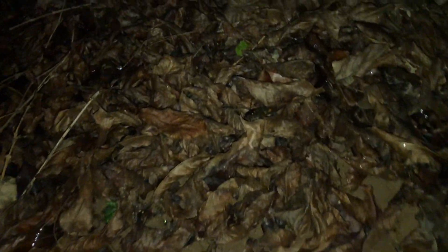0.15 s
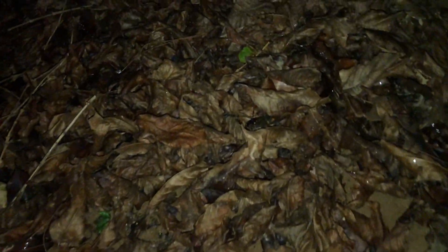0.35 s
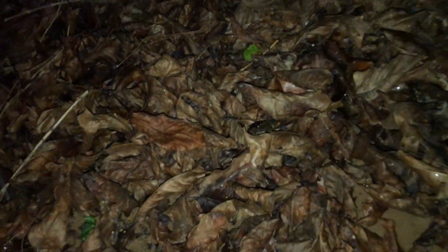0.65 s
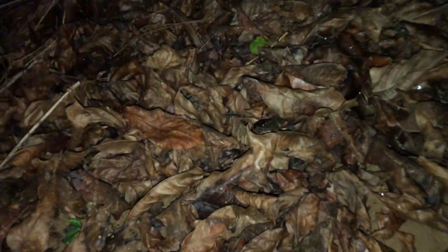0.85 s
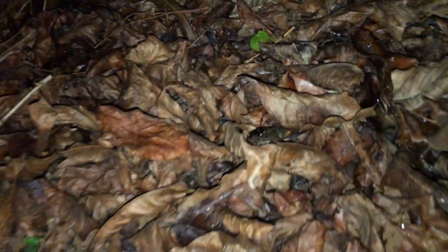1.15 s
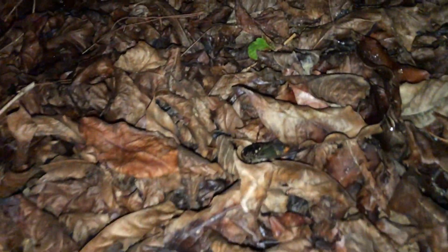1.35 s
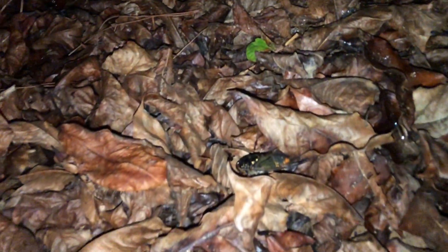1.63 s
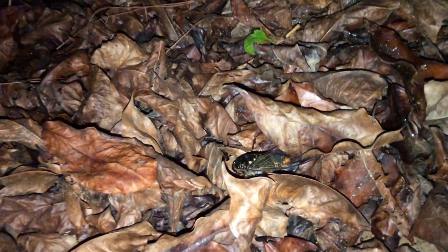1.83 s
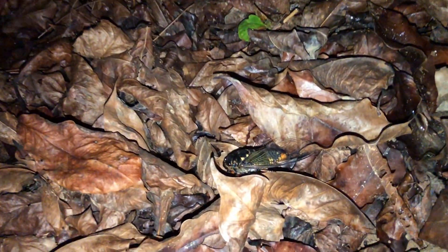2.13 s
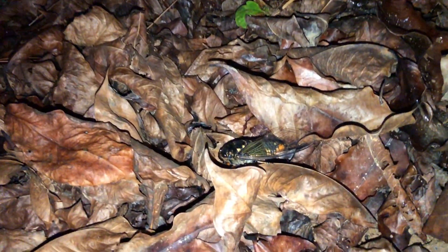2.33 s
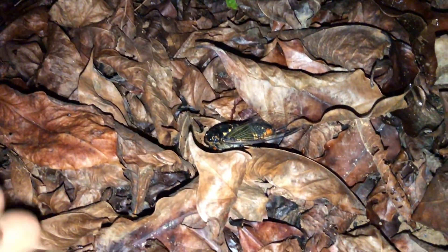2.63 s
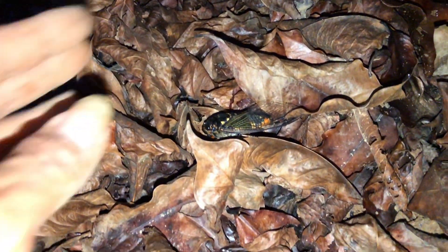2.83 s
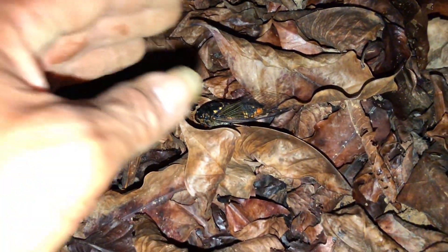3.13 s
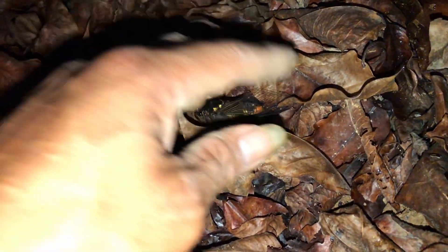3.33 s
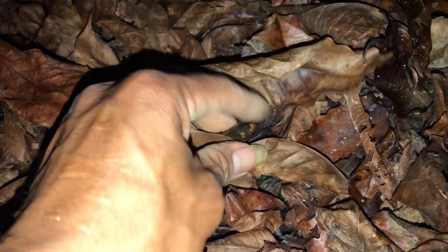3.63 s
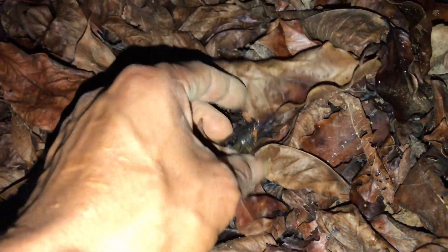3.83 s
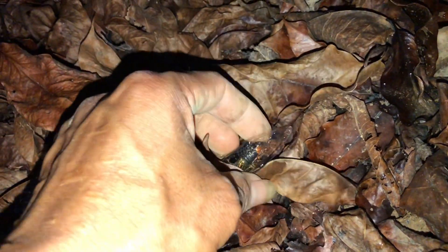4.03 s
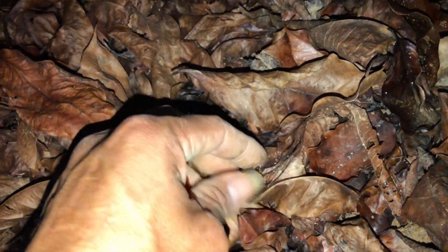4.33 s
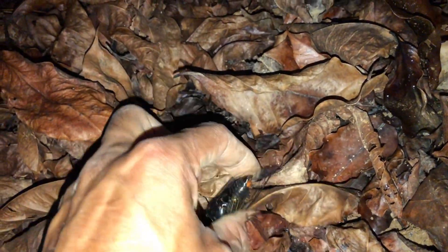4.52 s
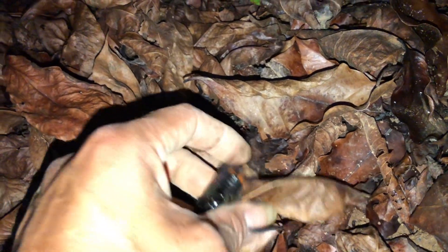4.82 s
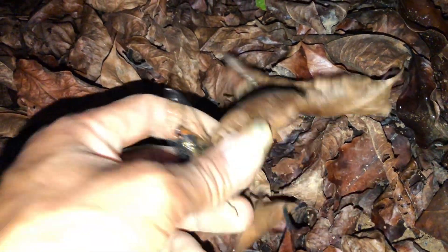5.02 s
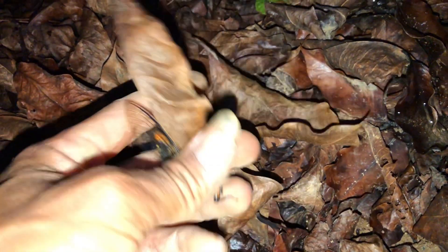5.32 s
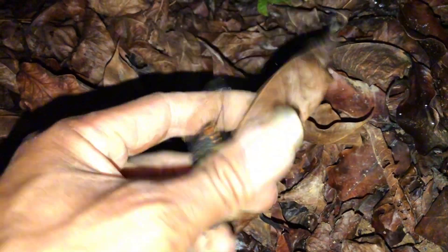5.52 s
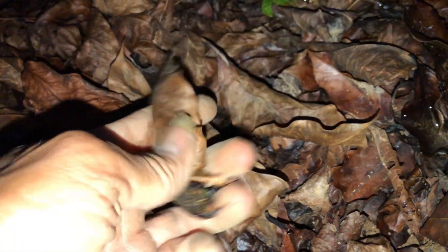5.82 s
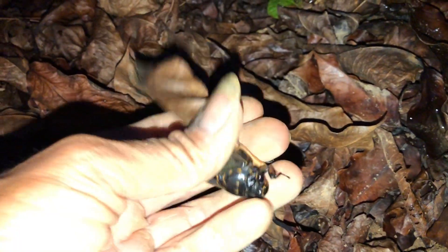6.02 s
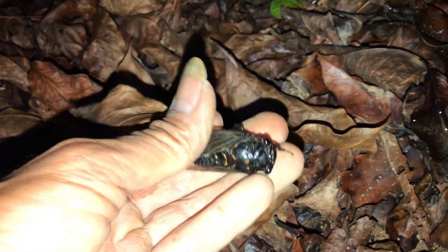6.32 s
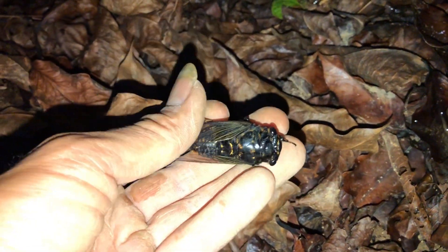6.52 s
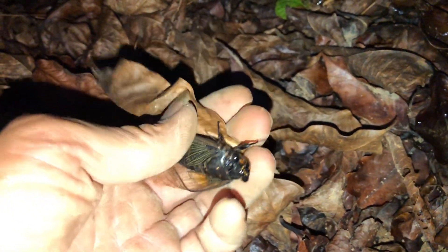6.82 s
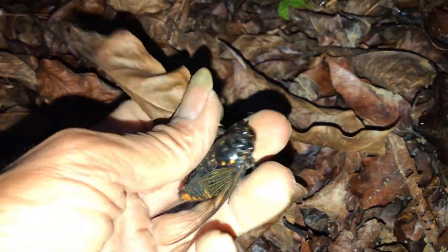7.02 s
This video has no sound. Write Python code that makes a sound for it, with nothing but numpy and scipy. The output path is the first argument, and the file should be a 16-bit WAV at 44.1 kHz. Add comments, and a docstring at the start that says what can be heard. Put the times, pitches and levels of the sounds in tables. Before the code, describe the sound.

In a forest at night, a high insect chorus hums with pulsing crickets and a far cicada whose buzz stops abruptly and later returns. Soft footfalls and finger bumps sound on damp leaves. Midway, a hand seizes a cicada, which erupts into a loud, dry, rattling screech very near the microphone, its tone shifting in the grip until the end.

```python
"""A seized cicada cries close by, over soft thuds, insects and low rumble in a forest at night.
Cicada: two tymbals buckle in turn, rib by rib, ringing body modes; hand and ground add echoes.
Far cicada: noise pulsed by blurred clicks. Crickets: pulsing tones and narrow noise. Katydid: noise strokes.
Feet on damp leaves and fingers: short damped sines. Far chorus, rumble and murmur: shaped noise."""
import sys
import numpy as np
from scipy import signal
from scipy.fft import rfft, irfft, next_fast_len
from scipy.io import wavfile
from scipy.ndimage import uniform_filter1d, minimum_filter1d, map_coordinates

SR = 44100
rng = np.random.default_rng(int(sys.argv[2]) if len(sys.argv) > 2 else 0)


def store_pcm(level_fs):
    """Save levels as 16-bit WAV."""
    pcm = np.round(np.clip(level_fs, -1, 1) * 32767).astype(np.int16)
    wavfile.write(sys.argv[1], SR, np.atleast_2d(pcm).T)


N = 315756
T = np.arange(N) / SR  # s
SEIZED_S = 3.592  # the cry begins


def cicada():
    """The ringing body plus scatter, inverted echoes and finger taps; so small a body radiates no bass."""
    covered_hz, open_hz, opens_s, opening_s = 2440, 2160, 4.96, .0087
    turns = muscle_turns()
    cry = ringing_body(turns)
    # leaves and fingers scatter a short tail, most of all in the treble
    tails = scattered(cry, t60_s=.022, size=16000)
    cry += filtered(tails, lambda hz: amp(np.interp(hz, [7000, 10000], [-14, -3])))
    cry -= ground_and_palm(cry)
    # the bass edge drops as the body comes out of the leaves
    covered, bare = [signal.sosfilt(signal.butter(7, hz, "high", fs=SR, output="sos"), cry)
                     for hz in (covered_hz, open_hz)]
    opening = step(T, opens_s, opening_s)
    return finger_taps(turns) + covered + (bare - covered) * opening


def muscle_turns():
    """Muscle cycles completed so far: the rate rises exponentially to a steady value."""
    top_rate_hz = 51.3
    # run-up of the muscles: [initial shortfall/Hz, time constant/s]
    run_up = [(7, .06), (6.3, .9)]
    since_s = (T - SEIZED_S).clip(0)
    rate_hz = top_rate_hz - sum(short * np.exp(-since_s / tau) for short, tau in run_up)
    return np.cumsum(rate_hz * (since_s > 0)) / SR


def rib_clicks():
    """Buckling ribs of both tymbals: place/cycles, active from/s, to/s, low/dB, air sac/dB, high/dB."""
    # tymbals: [place of first rib/cycles, all ribs buckle from t/s, level/dB]
    tymbals = [(.2, 3.74, 0), (.7, 3.92, -1)]
    # ribs: [delay/cycles, drive of two low modes/dB, of air sac/dB, of higher modes and snap/dB]
    ribs = [(0, -7.5, -1, -1.5), (.155, 0, -7.5, -4), (.255, -13, -12, -11), (.36, -7.5, -3.5, -1)]
    # stands in for the later ribs until all buckle: same columns
    early_rib = (.21, -4.5, 0, -1)
    clicks = []
    for place, full_s, db in tymbals:
        active = [(0, T[-1], ribs[0]), (0, full_s, early_rib)]
        active += [(full_s, T[-1], rib) for rib in ribs[1:]]
        for first_s, last_s, (delay, low, sac, high) in active:
            clicks.append((place + delay, first_s, last_s, low + db, sac + db, high + db))
    return np.transpose(clicks)


def mode_levels(s):
    """Drive/dB of each body mode at times s, as the hand covers and turns the insect."""
    # cry: [t/s, base level/dB, then re base: lowest mode/dB, second mode/dB, shrill mode/dB]
    cry = [(3.6, -29.5, -11, -5, -16), (3.62, -19.5, -12, -5, -8), (3.76, -20.5, -7, -6, -13),
           (3.88, -19.5, -8.5, -4.5, -13.5), (4.01, -17, -26, -5.5, -4), (4.36, -19, -11, -8, -1.5),
           (4.61, -19, -12, -10, -1), (4.78, -17.5, -16.5, -12.5, -2), (4.88, -20, -12.5, -10.5, -1.5),
           (5.08, -17, -7, -4.5, -6), (5.31, -19.5, -3.5, 0, -11), (5.5, -18, -18.5, -3, -11),
           (5.69, -19.5, -11, -0.5, -11), (5.76, -17.5, -10, -3.5, -13.5), (6.41, -17, -11, -11, -2),
           (6.92, -18.5, -9.5, -3.5, -16.5), (7.13, -16, -8, -18, -6), (7.16, -15.5, -8, -23, -11)]
    # treble: [t/s, base level/dB]
    treble = [(3.6, -36), (3.61, -28.5), (4.77, -32.5), (5.19, -35), (5.29, -27.5), (5.42, -42), (5.5, -32),
              (5.96, -35.5), (5.98, -24.5), (6.26, -39.5), (6.7, -26), (6.88, -38), (6.97, -23),
              (7.16, -24)]
    level, lowest, second, shrill = curves(cry, s)
    treble_db = curves(treble, s)[0]
    # the air sac gives way as the second and the shrill mode grow
    sac = level + 4.5 - .43 * (second + shrill)
    return [level + 16.5 + lowest, level + 17 + second, sac, level + 14 + shrill,
            treble_db + 10, treble_db + 8, level + 16]


def sac_pitch(s):
    """Pitch factor of the air sac: starts taut, settles, rises when gripped."""
    slack, taut, settle_s = .96, .34, .034
    # grips: [centre t/s, Gaussian width/s, rise of pitch factor]
    grips = [(5.05, 0.18, 0.09), (6.55, 0.095, 0.16), (7.12, 0.047, 0.12)]
    squeeze = slack + taut * np.exp(-(s - SEIZED_S) / settle_s)
    for at, width_s, rise in grips:
        squeeze = squeeze + rise * np.exp(-.5 * ((s - at) / width_s) ** 2)
    return squeeze


def ringing_body(turns):
    """Each rib buckles once a muscle cycle and rings every mode of tymbal and air sac, plus a snap."""
    # modes, lowest, second, air sac, shrill, two treble, snap: [nominal f/Hz, t60/s, relative pitch scatter]
    body = [(2720, .007, .025), (3650, .0075, .025), (4800, .006, .025), (7200, .004, .045),
            (10200, .003, .07), (13000, .0025, .07), (5900, .0016, .05)]
    place, first_s, last_s, low, sac, high = rib_clicks()
    cycles = np.arange(int(turns[-1]) + 1)[:, None]

    def chance():
        """Independent scatter for every click."""
        return rng.standard_normal((len(cycles), len(place)))

    def drift():
        """Slow scatter: a rib keeps its habit for some cycles."""
        return unit(uniform_filter1d(chance(), size=9, axis=0))

    s = np.interp(cycles + place + .006 * drift() + .002 * chance(), turns, T)
    on = (s > first_s) & (s < last_s)
    shifts = [1, 1, sac_pitch(s), 1, 1, 1, 1]
    rib_drives = [low, low, sac, high, high, high, high]
    cry = np.zeros(N)
    for (hz, t60_s, scatter), shift, rib_db, mode_db in zip(body, shifts, rib_drives, mode_levels(s[on])):
        strength_db = rib_db + 1.1 * drift() + .4 * chance()
        pitch_hz = hz * shift * (1 + scatter * (drift() + .4 * chance()))
        late_s = .0001 * np.abs(drift())
        cry += rings((s + late_s)[on], amp(strength_db[on] + mode_db), pitch_hz[on], t60_s, size=400)
    return cry


def ground_and_palm(cry):
    """Echoes off leaves, fingers and cupped palm, with the treble lost."""
    leaf_top_hz, fade_s = 6000, .03
    rest_ms, high_ms, lift_s, lift_takes_s = .32, .5, 4.66, .22
    ground_gain, free_s = .78, 4.93
    # fingers and palm: [start/s, end/s, delay/ms, gain]
    palms = [(4.84, 5.03, .3, .85), (5.03, 5.55, .32, .3), (5.4, 5.75, .25, .5), (6.3, 6.61, .22, .85)]
    dull = filtered(cry, lambda hz: 1 / (1 + (hz / leaf_top_hz) ** 4))
    # the ground echo comes later as the insect is lifted, and goes once it is clear of the leaves
    delay_ms = rest_ms + (high_ms - rest_ms) * step(T, lift_s, lift_takes_s)
    echoes = ground_gain * (1 - step(T, free_s, fade_s)) * echo(dull, delay_ms)
    for start, end, ms, gain in palms:
        echoes += gain * (step(T, start, fade_s) - step(T, end, fade_s)) * echo(dull, ms)
    return echoes


def finger_taps(turns):
    """For a few cycles one rib taps a finger: one damped sine a cycle."""
    from_s, to_s, place_cycles = 4.955, 5.04, .8
    taps_s = np.interp(np.arange(int(turns[-1]) + 1) + place_cycles, turns, T)
    taps_s = taps_s[(taps_s > from_s) & (taps_s < to_s)]
    gain = amp(-43 + rng.normal(0, 3, len(taps_s)))
    return rings(taps_s, gain, np.full(len(taps_s), 1300.), .003, size=400)


def far_cicada():
    """Uneven clicks, blurred by the trees, pulse noise; each phrase starts strongly in its own colour."""
    edge_s, onset_db, onset_s, pause_db = .014, 5, .26, -53
    # spectra of the two phrases: [f/Hz, relative level per Hz/dB]
    first_spectrum, second_spectrum = [(1060, -66), (1800, -66), (2230, -12.5), (2760, -10), (3210, -8),
                                       (5380, -4.5), (6460, -10.5), (12000, -21), (15600, -66),
                                       (22000, -120)], [(1060, -69), (1800, -17.5), (2360, -3), (3480, 0),
                                                          (4850, -3), (7510, -9), (10200, -7), (12000, -54),
                                                          (15600, -25), (22000, -120)]
    # steady narrow bands of the two phrases: [f/Hz, width/Hz, relative level/dB]
    first_bands, second_bands = [(2730, 19, 0), (2990, 34, -21), (3310, 15, -4), (3850, 40, -11.5),
                                 (3990, 29, 1.5), (4410, 32, -23), (5260, 250, 9), (5860, 57, 11),
                                 (6870, 41, -34)], [(2470, 40, -13), (2776, 11, -13.5), (3150, 110, -10),
                                                      (3740, 27, -10), (3900, 36, 11.5), (4910, 70, 3),
                                                      (5000, 350, 8.5), (6040, 17, -8), (5840, 21, -2)]
    # phrases: [start/s, end/s, level at start before onset boost/dB, swell/(dB/s)]
    phrases = [(-.1, 1.04, -39, 1), (1.57, 7.3, -45.5, 2.5)]
    click_rate_hz = 300 * (1 + .18 * wobble(150))
    clicks = np.diff(np.floor(np.cumsum(click_rate_hz) / SR), prepend=0)
    blur = amp(-60 * np.arange(600) / SR / .0097)
    puffs = signal.fftconvolve(clicks * amp(wobble(410)), blur)[:N]
    buzz = (puffs + 2.8) * patchy(depth_db=3.0)
    first = banded(buzz, first_spectrum, first_bands, bands_db=-3)
    second = banded(buzz, second_spectrum, second_bands, bands_db=-3)
    out = amp(pause_db) * (first + second) / 2  # faint throughout
    for (start, end, db, swell), voice in zip(phrases, [first, second]):
        onset = onset_db * np.exp(-(T - start).clip(0) / onset_s)
        level_db = db + swell * (T - start) + onset
        out += amp(level_db) * (step(T, start, edge_s) - step(T, end, edge_s)) * voice
    return out


def thuds():
    """Feet and fingers: a tick and a knock of a few cycles, then a lower bump that lingers."""
    # contacts: [t/s, nominal level/dB, knock f/Hz]
    contacts = [(0.176, -46, 285), (1.319, -42, 750), (1.673, -41, 270), (1.728, -42.5, 324),
                (1.738, -37, 716), (1.807, -41, 826), (1.844, -39.5, 676), (1.863, -44, 192),
                (2.166, -51.5, 470), (2.338, -49, 199), (2.449, -54, 148), (2.608, -46.5, 306),
                (2.813, -36, 510), (2.944, -47, 334), (3.094, -49, 493), (3.12, -37, 480),
                (3.29, -41.5, 220), (3.308, -37, 685), (3.324, -37.5, 700), (4.002, -53, 316),
                (4.237, -48, 320), (4.273, -48.5, 269), (4.327, -45, 362), (4.506, -45.5, 295),
                (5.491, -51, 272), (5.68, -48, 290), (6.499, -62, 310), (6.74, -63, 310), (7.011, -60, 248),
                (7.03, -57, 497), (7.13, -49, 330)]
    # fainter ones at random, up to 5.8 s
    count, faint_until_s = 10, 5.8
    when, size = rng.random(count), rng.standard_normal((2, count))
    faint = [when * faint_until_s, -57 + 3 * size[0], 330 * np.exp(.3 * size[1])]
    s, db, hz = np.hstack([np.transpose(contacts), faint])
    # harder contacts are higher and tick more
    tick = rings(s - .001, amp(db + 3.5) * hz / 700, 1.79 * hz, 7 / hz[:, None], size=2000)
    knock = rings(s, amp(db + 8.5), hz, 9 / hz[:, None], size=2000)
    bump = rings(s + .00366, amp(db - 6.5), .488 * hz, 6 / (.2 * hz[:, None]), size=4000)
    # high-pass 70 Hz, low-pass 2200 Hz
    return filtered(tick + knock + bump, lambda f: (1j * f / (1j * f + 70)) ** 2 / (1 + 1j * f / 2200) ** 2)


def crickets():
    """Each singer: a lightly pulsed tone plus resonant noise, as echoes blur it, swelling and fading."""
    hush_s = 3.38  # silent as the hand comes down
    # singers: [f/Hz, t60/s, mean chirp rate/Hz, swell centre/s, Gaussian width/s, mean peak level/dB]
    singers = [(5360, 0.013, 170, 3.66, 1, -37), (3313, 0.037, 65, 2.65, 0.34, -45.5),
               (9700, 0.0073, 81, 0.76, 0.5, -54.5), (10040, 0.018, 90, 1.86, 0.36, -54),
               (2390, 0.033, 43, 1.74, 0.34, -55), (3110, 0.017, 19, 1.7, 0.21, -50.5),
               (5650, 0.06, 110, 0.43, 0.63, -53)]
    out = np.zeros(N)
    for hz, t60_s, rate_hz, centre_s, width_s, db in singers:
        chirp_hz = rate_hz * (1 + .088 * wobble(3.4))
        chirps = 9.6 + np.sin(2 * np.pi * np.cumsum(chirp_hz) / SR)
        band_hz = np.log(1000) / np.pi / t60_s
        blur = filtered(chirps * rng.standard_normal(N),
                        lambda f: 1j * f * band_hz / (hz * hz - f * f + 1j * f * band_hz))
        clear = chirps * np.sin(2 * np.pi * np.cumsum(hz * (1 + .008 * wobble(40))) / SR)
        swell = np.exp(-.5 * ((T - centre_s) / width_s) ** 2)
        out += amp(db + .55 * wobble(4.7)) * swell * unit(unit(blur) + .85 * unit(clear))
    return out * (1 - step(T, hush_s, .01))


def katydid():
    """A high rasp: shaped noise in even strokes."""
    # rasp: [f/Hz, relative level per Hz/dB]
    rasp = [(10500, -35), (11300, -16), (12200, 6), (13200, 25), (13900, -34)]
    stroke_rate_hz = 7.37
    strokes = np.cos(np.pi * stroke_rate_hz * (T - .06)) ** 4
    return amp(-62) * strokes * coloured(rng.standard_normal(N), rasp)


def night():
    """Shaped noise: the blended far chorus over rumble and murmur that sink once the cry has begun."""
    # spectra: [f/Hz, relative level per Hz/dB]
    chorus_spectrum, rumble_spectrum, murmur_spectrum = [(590, -103), (1000, -57), (2220, -24),
                                                         (4610, -4.5), (4770, -5.5), (5810, -0.5),
                                                         (6370, -12), (6670, -4.5), (12500, -17),
                                                         (15900, -30)], [(20, -27), (45, -3), (70, -1.5),
                                                                         (115, -3), (250, -20)], [(100, 5),
                                                                                         (200, 2.5),
                                                                                         (320, 4.5),
                                                                                         (500, 2),
                                                                                         (900, -1.5),
                                                                                         (1500, 1.5),
                                                                                         (2200, 1.5)]
    # steady singers: [f/Hz, width/Hz, relative level/dB]
    chorus_bands = [(4840, 41, -5), (5420, 79, 6.5), (6230, 82, -2), (7060, 69, -21)]
    since_s = (T - SEIZED_S).clip(0)
    rumble_db = np.maximum(-69 - 4.5 * since_s, -86)
    murmur_db = np.maximum(-61.5 - 3.5 * since_s, -69.5)
    chorus = banded(patchy(depth_db=2.5), chorus_spectrum, chorus_bands, bands_db=-7.5)
    chorus = amp(-42.5 + .75 * wobble(2.64)) * chorus
    rumble = amp(rumble_db + 1.7 * wobble(15)) * coloured(rng.standard_normal(N), rumble_spectrum)
    murmur = amp(murmur_db + 1.7 * wobble(24.95)) * coloured(patchy(depth_db=1.0), murmur_spectrum)
    return chorus + rumble + murmur


def rings(s, gain, hz, t60_s, size):
    """Sum of damped sines, one started at each time s; each builds up within half a cycle."""
    first = np.ceil(s * SR).astype(int)
    t = (np.arange(size) + (first - s * SR)[:, None]) / SR
    cycles = hz[:, None] * t
    envelope = amp(-60 * t / t60_s) * (1 - np.exp(-2.5 * cycles))
    wave = gain[:, None] * envelope * np.sin(2 * np.pi * cycles)
    index = first[:, None] + np.arange(size)
    return np.bincount(index.ravel(), wave.ravel(), N + SR)[:N]


def scattered(x, t60_s, size):
    """Short random tails, crossfaded to a new one every size/2 samples as things move."""
    out, window = np.zeros(N + 2 * size), signal.windows.hann(size, sym=False)
    for start in range(0, N, size // 2):
        tail = rng.standard_normal(900) * amp(-60 * np.arange(900) / SR / t60_s)
        tail /= np.linalg.norm(tail)
        part = x[start:start + size]
        out[start:][:len(part) + 899] += signal.fftconvolve(part * window[:len(part)], tail)
    return out[:N]


def echo(x, delay_ms):
    """x delayed, by a fixed or moving time."""
    return map_coordinates(x, [np.arange(N) - delay_ms * SR / 1000])


def patchy(depth_db):
    """Noise whose gain drifts in long narrow streaks, as many singers come and go."""
    z = signal.stft(rng.standard_normal(N), nperseg=1024)[2]
    field = uniform_filter1d(rng.standard_normal(z.shape), size=2, axis=0)
    field = uniform_filter1d(field, size=30, axis=1)
    return signal.istft(z * amp(depth_db * unit(field)), nperseg=1024)[1][:N]


def banded(x, spectrum, bands, bands_db):
    """x through a broad spectrum plus narrow resonances, rms 1."""
    narrow = filtered(x, lambda f: sum(amp(db) * 1j * f * w / (c * c - f * f + 1j * f * w) for c, w, db in bands))
    return unit(coloured(x, spectrum) + amp(bands_db) * unit(narrow))


def coloured(x, spectrum):
    """x through (f/Hz, level/dB) points on a log axis, rms 1."""
    f, db = np.transpose([(1, -120), *spectrum, (SR / 2, -120)])
    return unit(filtered(x, lambda hz: amp(np.interp(np.log(hz + 1), np.log(f), db))))


def filtered(x, response):
    """x times a response of frequency/Hz."""
    m = next_fast_len(N + 8192)
    return irfft(rfft(x, m) * response(np.fft.rfftfreq(m, 1 / SR)), m)[..., :N]


def wobble(rate_hz):
    """Smooth random curve, rate_hz knots a second."""
    knots = rng.standard_normal(int(N * rate_hz / SR) + 4)
    return map_coordinates(knots, [np.arange(N) * rate_hz / SR])


def curves(rows, s):
    """Columns after the time, interpolated at times s."""
    t, *cols = np.transpose(rows)
    return np.array([np.interp(s, t, c) for c in cols])


def step(t, at, takes):
    """Smooth tanh rise from 0 to 1."""
    return .5 + .5 * np.tanh((t - at) / takes)


def amp(db):
    """dB to amplitude."""
    return 10 ** (np.asarray(db) / 20)


def unit(x):
    """x scaled to rms 1."""
    return x / np.sqrt(np.mean(x ** 2) + 1e-20)


def scene():
    """All sources summed, mono."""
    return (cicada() + far_cicada() + thuds() + crickets() + katydid() + night())[None]


def record(dry):
    """A quick limiter evens out the clicks; nothing is kept above the band limit."""
    limit, top_hz = .63, 15830
    needed = np.minimum(1, limit / (np.abs(dry) + 1e-9))
    gain = minimum_filter1d(needed, size=121)
    gain = uniform_filter1d(uniform_filter1d(gain, size=61), size=61)
    return filtered(dry * gain, lambda hz: hz < top_hz)


dry = scene()
out = record(dry)
store_pcm(out)
```